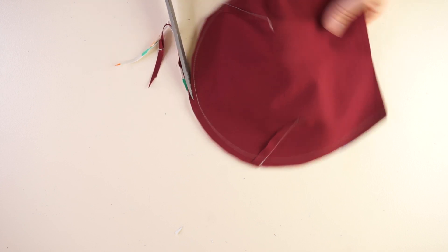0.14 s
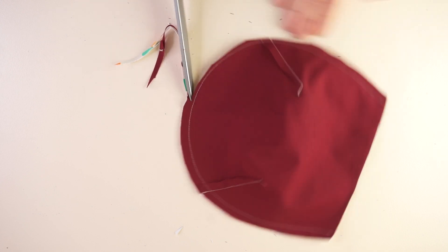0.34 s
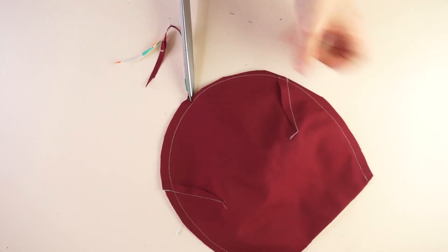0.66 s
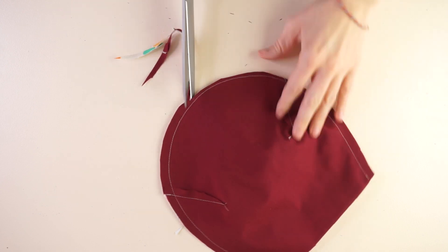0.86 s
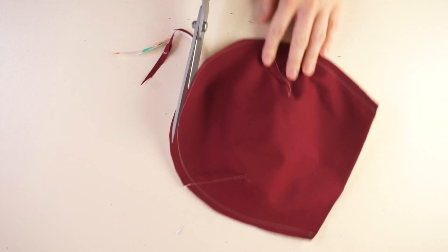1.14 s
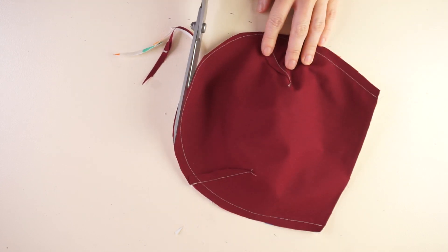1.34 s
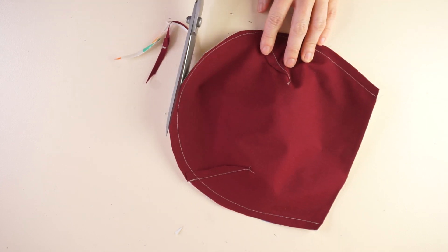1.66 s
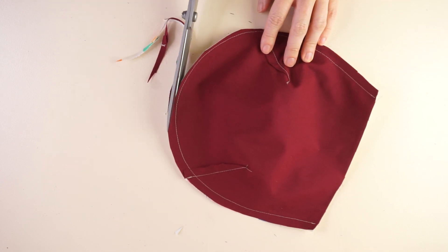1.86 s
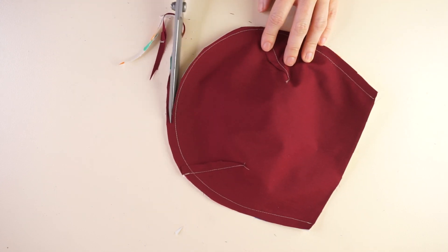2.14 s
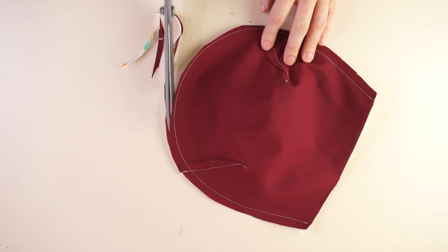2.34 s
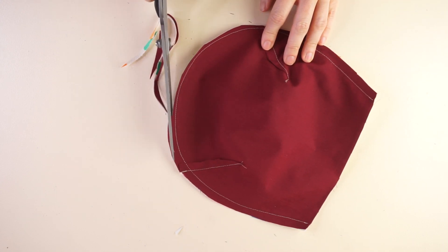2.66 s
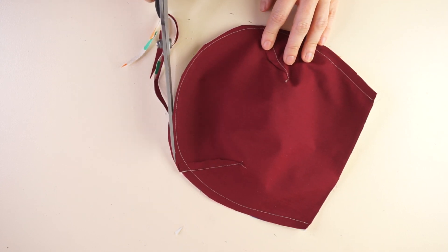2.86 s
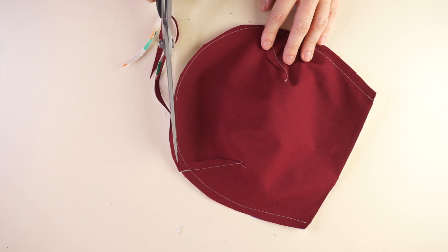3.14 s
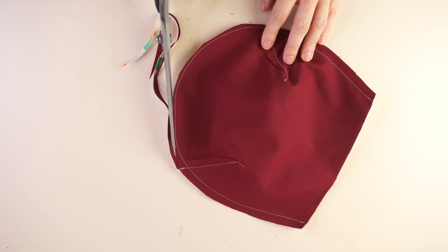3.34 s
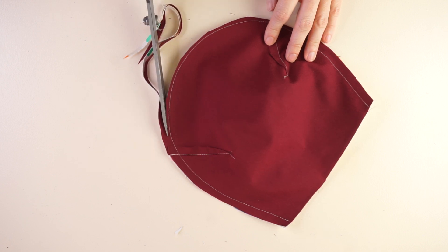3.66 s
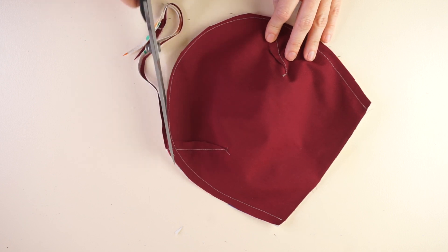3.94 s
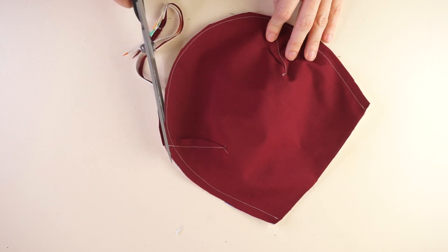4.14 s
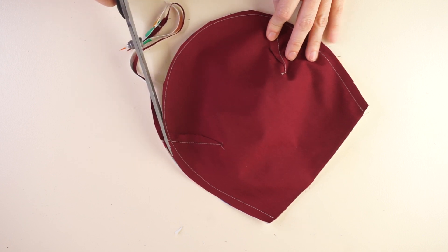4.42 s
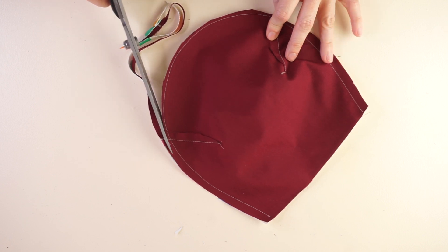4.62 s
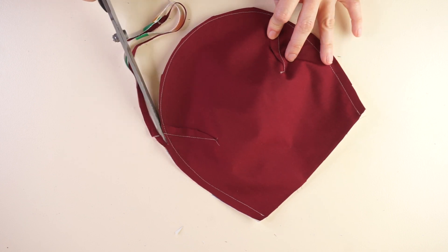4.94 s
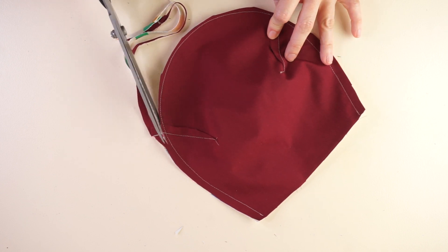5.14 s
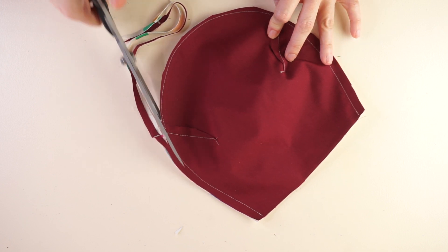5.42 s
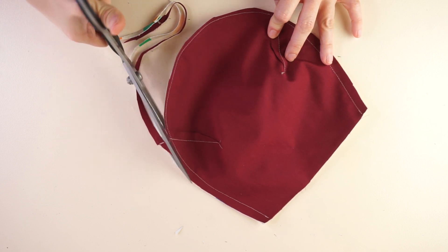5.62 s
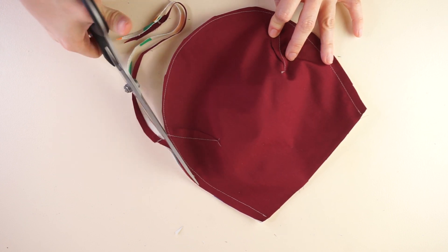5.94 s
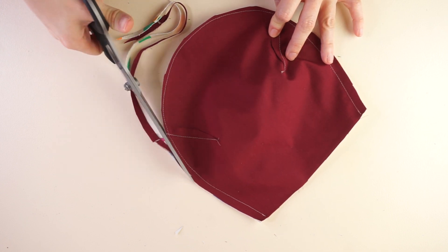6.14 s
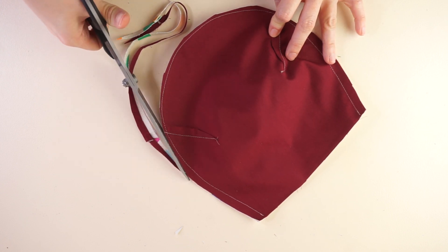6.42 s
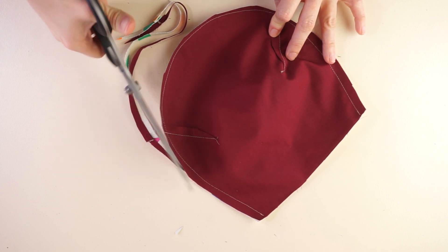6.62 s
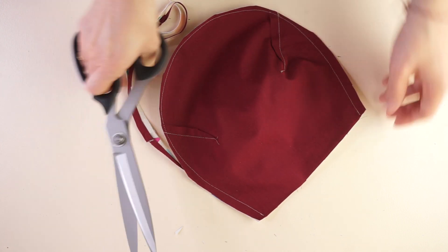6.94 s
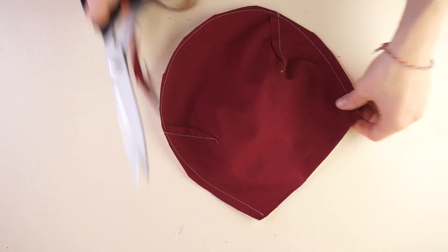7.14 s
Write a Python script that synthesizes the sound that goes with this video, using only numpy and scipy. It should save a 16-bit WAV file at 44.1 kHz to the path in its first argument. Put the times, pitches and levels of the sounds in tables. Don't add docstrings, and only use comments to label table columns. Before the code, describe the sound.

Heavy shears cut stitched cloth in separate scratchy strokes on a hollow tabletop, hands sliding the fabric between, in a quiet small room.

```python
import sys
import numpy as np
from scipy import signal
from scipy.fft import rfft, irfft
from scipy.io import wavfile
from scipy.ndimage import uniform_filter1d

SR = 44100
rng = np.random.default_rng(int(sys.argv[2]) if len(sys.argv) > 2 else 0)


def file_out(sig):
    cols = np.atleast_2d(sig).T
    lim = np.clip(cols, -1, 1)
    pcm = np.round(lim * 32767).astype(np.int16)
    wavfile.write(sys.argv[1], SR, pcm)


def magnitude_from_level(level_db):
    exponent = np.asarray(level_db, float) / 20
    return 10 ** exponent


N = 321048


def evened(x):
    return x / np.sqrt(np.mean(x ** 2) + 1e-20)


def smooth_twice(x, samples):
    return uniform_filter1d(uniform_filter1d(x, samples), samples)


def read(points, hz):
    f, value = np.transpose(points)
    return np.interp(np.log(hz + 1), np.log(f + 1), value)


def add(mix, s, sound):
    part = mix[round(s * SR):][:len(sound)]
    part += sound[:len(part)]


def through(x, taps):
    return signal.oaconvolve(x, taps)[:len(x)]


def colour(points):
    level_db = np.maximum(read(points, np.fft.rfftfreq(4096, 1 / SR)), -100)
    folded = irfft(np.log(magnitude_from_level(level_db)))
    folded[1:2048] *= 2
    folded[2049:] = 0
    taps = irfft(np.exp(rfft(folded)))[:2048]
    return taps / np.linalg.norm(taps)


def body(modes, low_hz=50, high_hz=11500):
    t = np.arange(SR // 8) / SR
    ring = np.zeros(len(t))
    for k, (hz, width_hz, db) in enumerate(modes):
        decay = np.exp(-np.pi * width_hz * t)
        ring += (-1) ** k * magnitude_from_level(db) * width_hz * decay * np.sin(2 * np.pi * hz * t)
    band = signal.butter(3, [low_hz, high_hz], "band", fs=SR, output="sos")
    ring = signal.sosfilt(band, ring)
    return ring / np.linalg.norm(ring)


def grit(per_s, spread_db, lump_s, lump_db):
    size = magnitude_from_level(spread_db * np.minimum(rng.exponential(1, N), 4)) * rng.standard_normal(N)
    breaks = rng.random(N) < per_s / SR
    lumps = evened(smooth_twice(rng.standard_normal(N), int(lump_s * SR)))
    return evened(size * breaks * magnitude_from_level(lump_db * lumps))


def pair(mid, side, width):
    side_gain = magnitude_from_level(read(width, np.fft.rfftfreq(len(side), 1 / SR)))
    side = irfft(rfft(side) * side_gain, len(side))
    return np.array([mid + side, mid - side])


# (frequency [Hz], density [dB/Hz])
HUSH = [(15, -44), (25, -9), (110, 6.5), (166, -2), (256, 0), (564, -9), (710, -10.5), (1100, -12.5),
        (1340, -10.5), (2750, -10.5), (3550, -16), (10400, -21), (11200, -20), (14600, -44), (22000, -120)]
# (frequency [Hz], side re mid [dB])
HUSH_WIDTH = [(60, -24), (220, -1.5), (830, 5.5), (3100, -1.5), (11600, -1)]


def hush():
    mid, side = (through(rng.standard_normal(N), colour(HUSH)) for _ in range(2))
    return magnitude_from_level(-64.5) * pair(mid, side, HUSH_WIDTH)


# (start [s], length [s], rub [dB], airiness re rub [dB], weight re rub [dB])
SLIDES = [(-0.02, 0.097, -45.5, -14, 0), (0.318, 0.11, -44.5, -8.5, -5), (0.374, 0.23, -44.5, -10.5, -12.5),
          (0.5, 0.59, -62, 0, -8), (0.851, 0.13, -54.5, -10, -13), (0.88, 0.85, -53.5, 1.5, -10.5),
          (1.07, 0.31, -59.5, -11, 12), (1.33, 0.58, -60, -46, 9), (2.349, 0.48, -61, 0.5, 1.5),
          (2.93, 0.37, -65.5, -6, 7), (3.7, 0.69, -54.5, -4, -3.5), (4.62, 0.52, -53, -7, 3),
          (5.16, 0.11, -55.5, -3, 3.5), (5.22, 0.32, -62, -7, 7), (5.68, 0.1, -59.5, -12, -16),
          (6.54, 0.83, -58, -8, 1.5), (6.993, 0.033, -46.5, -12, 6), (7.0, 0.25, -52, -13, -2.5),
          (7.123, 0.18, -48, -14, -17), (7.19, 0.16, -48, -12, -13)]


def drags():
    rise, fade_db = 0.19, -19.5
    out = np.zeros((3, N))
    for s, length, db, air_db, weight_db in SLIDES:
        u = np.arange(0, 1, 1 / (length * SR))
        slowing_db = fade_db * np.maximum(u - rise, 0) ** 0.73
        speed = np.minimum(u / rise, 1) ** .5 * magnitude_from_level(db + slowing_db)
        for layer, layer_db in zip(out, (0, air_db, weight_db)):
            add(layer, max(s, 0), magnitude_from_level(layer_db) * speed[round(max(-s, 0) * SR):])
    return uniform_filter1d(out, int(0.003 * SR), axis=-1)


# (frequency [Hz], density [dB/Hz])
RUB = [(290, -13), (500, -4), (1090, -1.5), (1340, -1.5), (1450, -2), (2900, -7.5), (4500, -14),
       (7000, -29), (9900, -120)]
# (frequency [Hz], density [dB/Hz])
SWISH = [(1800, -23), (3500, 7), (4780, 1.5), (7090, -0.5), (10500, 4.5), (11200, 1), (14600, -85),
         (22000, -120)]
# (frequency [Hz], width [Hz], level [dB])
HOLLOW = [(188, 230, -3), (240, 150, 2), (295, 33, 8), (405, 97, 1)]


def sliding():
    rub, swish, rumble = magnitude_from_level(-6) * drags()
    lumps = grit(3000, 2.5, 0.05, 2.5)
    weave = grit(7000, 1.2, 0.012, 2.2)
    return (through(rub * weave, colour(RUB)) + through(swish * weave, colour(SWISH))
            + through(rumble * lumps, body(HOLLOW, 120)))


# (time [s], hand effort [dB])
STROKES = [
    [(0.045, -55.5), (0.08, -45), (0.14, -47.5), (0.185, -49.5), (0.2, -60)],
    [(1.435, -51.5), (1.527, -64.5), (1.679, -57.5), (1.785, -51.5), (1.923, -55.5), (2.017, -45.5),
     (2.089, -47), (2.195, -41.5)],
    [(2.29, -57), (2.37, -64)],
    [(3.2, -69), (3.24, -52.5), (3.286, -50), (3.406, -44), (3.462, -43.5), (3.502, -41), (3.542, -42.5),
     (3.61, -42)],
    [(4.1, -61.5), (4.156, -57.5), (4.276, -41.5), (4.33, -109)],
    [(4.34, -57), (4.43, -60), (4.586, -50.5), (4.714, -110), (4.8, -79)],
    [(4.885, -67), (4.947, -58), (4.969, -38.5), (4.977, -39.5), (5.04, -45)],
    [(5.12, -50.5), (5.216, -84), (5.28, -89)],
    [(6.065, -77), (6.115, -67.5), (6.186, -55.5), (6.256, -54.5), (6.306, -49), (6.36, -52), (6.41, -45)],
]
# (blade ring [dB], overtone [dB], edge hiss [dB], table [dB], all re effort,
# end tip nearness [0-1])
GRIPS = [(2, 2.5, -9.5, -2.5, 0.88), (1, -1.5, -12, -4, 0.84), (3, -2.5, -6, -4, 0.78),
         (0.5, -1.5, -12, -5.5, 0.78), (2, -2.5, -11.5, -3.5, 0.83), (-2, -0.5, -12, -9, 0.93),
         (-3.5, 3.5, -9.5, -4.5, 0.6), (-4, 6, -2.5, -4.5, 0.72), (5.5, 2, -8, 5, 0.67)]


def strokes():
    tip_start, tip_curve = 0.2, 0.58
    levels_db, tip = np.full((4, N), -120.), np.full(N, tip_start)
    for rows, (ring_db, upper_db, hiss_db, table_db, tip_end) in zip(STROKES, GRIPS):
        s, effort_db = np.transpose(rows)
        t = np.arange(s[0], s[-1], 1 / SR)
        travel = ((t - s[0]) / (s[-1] - s[0])) ** tip_curve
        near = tip_start + (tip_end - tip_start) * travel
        at = slice(round(s[0] * SR), round(s[0] * SR) + len(t))
        tip[at] = near
        layers_db = [ring_db + 0 * t, 1.5 + upper_db - 2.5 * near, hiss_db + 6.5 * near, table_db + 6.5 * near]
        levels_db[:, at] = np.interp(t, s, effort_db) + np.array(layers_db)
    return levels_db, tip


def bell(s, length):
    swell_db, release_db = -16.5, -9.5
    length = max(length, .002)
    u = np.arange(-1.5, 4, 1 / (length * SR))
    level_db = np.where(u < 0, swell_db * u ** 2, release_db * abs(u) ** 0.88)
    return s + u[0] * length, magnitude_from_level(level_db), u * length


# (time [s], blade ring [dB], overtone re ring [dB], length
# [s])
BUNCHES = [(0.1123, -28, -21, 0.0096), (0.1468, -22.5, -28, 0.0054), (0.182, -26, -9, 0.0074),
           (1.6641, -25.5, -17.5, 0.01), (1.6871, -34, -6, 0.003), (1.722, -18.5, -14.5, 0.0038),
           (1.7507, -45, -18, 0.0028), (1.7906, -24.5, -11, 0.01), (1.8187, -25.5, -1, 0.0022),
           (1.8312, -20, -12, 0.0025), (1.8601, -30, -5, 0.0052), (1.8744, -31.5, -13, 0.015),
           (1.9176, -18.5, -12, 0.0063), (1.9673, -27, -18, 0.01), (1.994, -25, -7, 0.0038),
           (2.0371, -26.5, -9, 0.013), (2.1058, -25.5, -6, 0.0072), (2.1334, -25.5, -15, 0.0093),
           (2.1493, -18.5, -11, 0.0023), (2.1773, -22.5, -17, 0.0043), (2.2045, -29, -23, 0.0032),
           (3.314, -28.5, -4, 0.0084), (3.3481, -28.5, -9, 0.0035), (3.376, -28.5, -4.5, 0.0045),
           (3.4158, -29, -9, 0.0027), (3.459, -22.5, -7, 0.0045), (3.4717, -24, -6, 0.005),
           (3.4873, -47, -8, 0.0026), (3.5072, -22.5, -11, 0.0084), (3.5385, -28, -10, 0.01),
           (3.5652, -23, -11, 0.0077), (3.611, -18, -18, 0.0017), (3.6272, -38, -22, 0.0024),
           (4.2045, -31, 1, 0.0092), (4.231, -18, -11.5, 0.011), (4.2485, -28, -8, 0.0018),
           (4.2795, -24.5, -11, 0.0025), (4.3213, -38, -24, 0.0035), (4.5732, -25.5, -23, 0.0027),
           (4.9582, -30.5, -1, 0.0078), (5.0104, -37, -19, 0.0022), (6.1801, -26.5, -13, 0.0024),
           (6.1972, -27, -11, 0.0071), (6.2185, -28, -6, 0.0045), (6.2621, -26.5, -10, 0.011),
           (6.2802, -25, -15, 0.0039), (6.3109, -20.5, -10, 0.004), (6.3444, -25.5, -7.5, 0.0099),
           (6.3706, -22, -17, 0.0068), (6.4445, -24.5, -20, 0.0094),
           (0.118, -30, -10, 0.011), (0.168, -36, -15, 0.0034), (0.854, -54, -15, 0.014),
           (0.89, -53, -12, 0.005), (0.908, -57, -12, 0.011), (0.936, -55, -10, 0.014),
           (1.036, -51, 3, 0.005), (1.356, -59.5, -13, 0.03), (2.058, -31, -9, 0.0051),
           (2.086, -28, -6.5, 0.007), (2.189, -43, 1, 0.0057), (3.339, -31.5, 2, 0.006),
           (3.363, -23.5, -6, 0.0062), (3.395, -39, 0, 0.0042), (3.429, -34, 2, 0.008),
           (7.086, -49, -21, 0.01), (7.14, -46, -18, 0.008), (1.444, -48.5, -6, 0.029),
           (1.559, -33, -6, 0.008), (1.589, -32, -10, 0.005), (1.606, -36, -10, 0.005),
           (2.026, -25, -10.5, 0.0062), (2.299, -32, -13, 0.0046), (3.228, -43, 0, 0.012),
           (3.263, -35, -1, 0.0091), (4.11, -39, -3, 0.012), (4.144, -43.5, 3, 0.0046),
           (4.182, -40.5, 6, 0.0083), (4.255, -31.5, 7.5, 0.0071), (4.482, -53, 15.5, 0.0025),
           (4.52, -57, -5, 0.0045), (4.532, -37, -4, 0.006), (4.54, -40, 2, 0.015), (4.562, -47, 3, 0.0076),
           (4.69, -52, 5, 0.0045), (4.739, -46, -1, 0.0069), (4.896, -45, -7, 0.0081),
           (4.944, -38, -7.5, 0.016), (4.963, -36.5, 12, 0.002), (4.982, -37, -21, 0.0048),
           (4.985, -22, -12, 0.0057), (5, -20, -17, 0.0036), (5.139, -31.5, -22, 0.0062),
           (5.244, -41, -19, 0.0084), (6.081, -49.5, -9, 0.0071), (6.115, -47.5, 3.5, 0.0043),
           (6.132, -36, -14, 0.0095), (6.145, -36.5, -6, 0.0047), (6.169, -36.5, -2, 0.0051),
           (6.408, -22, -5, 0.013)]
# (time [s], hiss [dB], edge pitch [Hz], length [s])
SCRAPES = [(0.11, -41, 9300, 0.0073), (0.128, -41, 10100, 0.0092), (0.143, -36.5, 9870, 0.006),
           (0.155, -33, 10200, 0.0049), (0.181, -30.5, 9600, 0.0048), (1.1788, -53, 8600, 0.0022),
           (1.66, -41, 10130, 0.005), (1.686, -46, 10080, 0.004), (1.7206, -37, 9870, 0.005),
           (1.725, -41.5, 9900, 0.0066), (1.7845, -36, 10000, 0.0051), (1.827, -39, 10260, 0.0095),
           (1.859, -37.5, 10160, 0.0067), (1.915, -36, 10340, 0.0057), (1.965, -45.5, 10600, 0.0041),
           (2.065, -33, 9700, 0.0058), (2.089, -29, 10050, 0.0038), (2.104, -31, 9900, 0.0034),
           (2.113, -34, 9800, 0.004), (2.132, -25.5, 9830, 0.0034), (2.147, -28.5, 10000, 0.004),
           (2.167, -29, 9200, 0.0036), (2.174, -30, 9170, 0.0033), (2.192, -33, 8800, 0.0031),
           (3.38, -42, 10100, 0.0034), (3.416, -43, 10700, 0.0066), (3.5067, -31.5, 9600, 0.0034),
           (3.536, -29.5, 9840, 0.0068), (3.553, -36, 9700, 0.0057), (3.565, -31, 9500, 0.0081),
           (3.615, -37, 9400, 0.002), (3.63, -39, 8900, 0.0032), (4.114, -47, 10200, 0.0029),
           (4.143, -51, 10140, 0.0046), (4.182, -42.5, 10570, 0.0045), (4.206, -45, 10550, 0.013),
           (4.573, -41, 9700, 0.004), (4.687, -48, 9500, 0.0048), (4.737, -48, 9560, 0.0043),
           (4.894, -49, 9850, 0.017), (4.991, -45, 10800, 0.003), (5.006, -45, 10500, 0.0056),
           (5.135, -41, 9700, 0.0018), (6.14, -45, 10560, 0.0041), (6.195, -38, 10200, 0.0039),
           (6.216, -47, 10300, 0.0055), (6.369, -36, 10650, 0.0074), (6.432, -33.5, 10300, 0.003),
           (6.515, -46, 10360, 0.0086),
           (0.109, -40.5, 10200, 0.033), (1.557, -46, 9500, 0.0089), (3.34, -46, 10200, 0.038),
          (4.235, -43.5, 10300, 0.027), (4.538, -50.5, 9900, 0.021), (4.712, -56, 9500, 0.0092),
          (4.932, -45.5, 9900, 0.013), (4.951, -35, 9900, 0.0058), (4.956, -30.5, 9800, 0.0054),
          (4.963, -29, 9500, 0.0038), (6.132, -52, 10400, 0.0072), (6.181, -46, 10250, 0.015),
          (6.26, -46, 10200, 0.0083), (6.347, -39.5, 10100, 0.025)]
UPPER_HZ = [2400, 2700, 2700, 2514, 2520, 2750, 2630, 2560, 2510]


def slips(tip):
    blade_hz, blade_rise_hz, blade_spread_hz = 1309, 40, 39
    upper_wander_hz, upper_rough = 75, 0.5
    bunch, upper, scrape, flex, squeak = np.zeros((5, N))
    for s, db, upper_db, length in BUNCHES:
        start, swell, t = bell(s, length)
        hz = blade_hz + blade_rise_hz * tip[round(s * SR)] + blade_spread_hz * rng.standard_normal()
        add(bunch, start, magnitude_from_level(db) * swell)
        add(upper, start, magnitude_from_level(db + upper_db) * swell)
        add(flex, start, swell * magnitude_from_level(db - 6.5) * np.sin(2 * np.pi * hz * t))
    stroke_starts = [rows[0][0] for rows in STROKES]
    stroke = np.maximum(np.searchsorted(stroke_starts, np.arange(N) / SR) - 1, 0)
    wander, rough = (evened(smooth_twice(z, 90)) for z in rng.standard_normal((2, N)))
    upper_hz = np.array(UPPER_HZ)[stroke] + upper_wander_hz * wander
    overtone = np.sin(2 * np.pi * np.cumsum(upper_hz) / SR)
    flex += magnitude_from_level(-7.0) * upper * (1 + upper_rough * rough) * overtone
    for s, db, hz, length in SCRAPES:
        start, swell, t = bell(s, length)
        add(scrape, start, magnitude_from_level(db) * swell)
        add(squeak, start, magnitude_from_level(db) * swell * np.sin(2 * np.pi * hz * t))
    return bunch, upper, scrape, flex, squeak


def gains(levels_db):
    return uniform_filter1d(magnitude_from_level(levels_db), int(0.0086 * SR), axis=-1)


# (frequency [Hz], width [Hz], level [dB])
BOOM = [(76.6, 4.2, -24), (85.9, 7.4, 22)]


def boom_push(drive):
    drum = through(rng.standard_normal(N), body(BOOM))
    drum /= np.sqrt(uniform_filter1d(drum ** 2, 1500) + 0.017)
    lag = np.exp(-np.arange(6000) / SR / 0.015) / (0.023 * SR)
    return through(drive, lag) * drum


# (frequency [Hz], width [Hz], level [dB])
RING = [(972, 196, -9), (1150, 197, -5), (1307, 80, 1), (1471, 72, 0), (1504, 88, -1.5), (1683, 105, -7.5)]
# (frequency [Hz], width [Hz], level [dB])
OVERTONES = [(2260, 710, 1), (2380, 190, 5), (2484, 88, -3.5), (2700, 120, 3), (2764, 260, -0.5),
             (3560, 740, -9.5)]
# (frequency [Hz], width [Hz], level [dB])
TIPS = [(3700, 380, 2), (4300, 360, 6), (4500, 134, 9), (4890, 140, 4), (5240, 300, 1.5), (5840, 420, -1.5),
        (7150, 600, -15)]
# (frequency [Hz], width [Hz], level [dB])
EDGE = [(7600, 18000, -8.5), (8280, 42, 3.5), (9500, 490, -4), (9900, 100, 5.5), (11300, 2800, -2.5)]
# (frequency [Hz], width [Hz], level [dB])
TABLE = [(149, 49, -6), (242.6, 36, 0), (300, 40, 0), (419, 78, -0.5), (520, 61, -2), (598, 60.4, 2),
         (648.2, 28.5, 6.5), (733, 68, 0)]


def cutting():
    levels_db, tip = strokes()
    ring, overtone, hiss, table = gains(levels_db)
    bunch, upper, scrape, flex, squeak = slips(tip)
    threads = grit(7000, 2.2, 0.0065, 3.2)
    fuzz = grit(14000, 1.5, 0.008, 3.5)
    burst = grit(18000, 0.9, 0.006, 1.5)
    wobble = 0.77 + 0.77 * evened(smooth_twice(rng.standard_normal(N), 40))
    follow = np.minimum(np.hypot(1, magnitude_from_level(-10.5) * bunch / (ring + 1e-5)), 4)
    short_db = -24 + 25 * np.clip(tip, 0, 1)
    ring_drive = magnitude_from_level(-0.5) * ring * threads + magnitude_from_level(-12.5) * bunch * burst
    overtone_drive = magnitude_from_level(-4.0) * overtone * fuzz + magnitude_from_level(-14.5) * upper * burst
    tips_drive = overtone * follow ** .25 * gains(short_db) * burst
    edge_drive = magnitude_from_level(-1.0) * hiss * fuzz + magnitude_from_level(-7) * scrape * burst
    blades = through(ring_drive, body(RING, 900, 1730)) + flex
    blades += through(overtone_drive, body(OVERTONES, 990, 3290))
    blades += through(tips_drive, body(TIPS, 3640, 6900))
    edges = through(edge_drive, body(EDGE, 5240)) + magnitude_from_level(-5.5) * squeak * wobble
    edges += magnitude_from_level(-15) * through(scrape * burst, colour(SWISH))
    top = through(table * follow ** .5 * burst, body(TABLE, 141, 760))
    top += magnitude_from_level(-9.5) * boom_push(np.hypot(table * follow, magnitude_from_level(-7.5) * bunch))
    return blades + edges + top


# (frequency [Hz], density [dB/Hz])
CLINK = [(500, -35), (1400, 6), (2000, 1), (2600, -1.5), (3600, -27), (4000, -35), (9900, -94)]


def clinking(blow):
    return magnitude_from_level(15.5) * through(blow, body(OVERTONES, 1600)) + magnitude_from_level(18.0) * through(blow, colour(CLINK))


# (time [s], peak [dB])
TICKS = [
    (0.1846, -31),
    (0.6097, -58),
    (1.178, -39),
    (4.14, -43),
    (4.481, -42),
    (5.767, -57),
]


def ticks():
    out, clink = np.zeros((2, N))
    t = np.arange(300) / SR
    for s, db in TICKS:
        noise = rng.standard_normal(300)
        add(out, s, magnitude_from_level(db - 60 * t / 0.011) * noise)
        add(clink, s, magnitude_from_level(db - 17 - 60 * t / 0.0027) * noise)
    return out + clinking(clink)


# (time [s], peak [dB], pitch [Hz], hardness [dB])
KNOCKS = [(0.321, -44.5, 520, -8), (0.333, -44, 610, -34), (0.347, -57, 610, -26), (1.199, -54, 333, -27),
          (1.302, -25, 426, -25), (1.3073, -31, 430, -33.5), (1.345, -51.5, 460, -44),
          (1.36, -43, 400, -33), (6.998, -68, 370, -12), (7.023, -46, 300, -29), (7.044, -46, 300, -27),
          (7.146, -44.5, 404, -14), (7.174, -39.5, 480, -23), (1.5374, -41, 388, -5),
          (2.81, -31.5, 506, -11), (3.009, -49.5, 394, -33), (3.237, -37.5, 313, -46),
          (3.247, -34, 405, -23), (5.537, -58.5, 1820, -7), (5.815, -51, 240, -38), (6.9922, -55, 350, -5),
          (7.008, -42, 356, -31), (7.135, -52, 382, -12), (7.199, -45.5, 433, -24), (7.212, -57, 1310, -7)]


def knocks():
    t60_s, upper_hz, upper_db = 0.03, 770, -12
    out, push, clink = np.zeros((3, N))
    t = np.arange(SR // 6) / SR
    for s, db, hz, hard_db in KNOCKS:
        note = np.sin(2 * np.pi * hz * t) + magnitude_from_level(upper_db) * np.sin(2 * np.pi * upper_hz * t)
        attack = 1 - np.exp(-t / 0.00085)
        add(out, s, -magnitude_from_level(db + 3 - 60 * t / t60_s) * note * attack)
        add(push, s, magnitude_from_level(db - 4.5 + 0.66 * hard_db) * np.hanning(24))
        noise = rng.standard_normal(1200)
        add(clink, s, magnitude_from_level(db + hard_db - 15.0) * noise * np.exp(-t[:1200] / 0.0056))
    rap = magnitude_from_level(9.5) * through(push, body(TABLE, 103)) + magnitude_from_level(2.0) * through(push, body(BOOM))
    return out + clinking(clink) + rap


# (time [s], peak [dB])
THUDS = [(0.898, -49), (1.108, -54), (2.997, -50.5), (3.238, -38.5), (3.598, -40), (4.102, -48.5),
         (4.973, -39), (5.65, -59), (6.117, -47), (6.416, -34), (6.998, -45.5)]


def thuds():
    thud = np.zeros(N)
    for s, db in THUDS:
        add(thud, s, magnitude_from_level(db - 15.0) * np.hanning(200))
    return through(thud, body(BOOM))


# (time [s], peak [dB], edge [dB], table [dB], blade ring [dB], all re peak)
SNAPS = [
    (3.5943, -37, 20, 5, 19.5),
    (4.9649, -20.5, 9, -24, -10),
    (4.9734, -29, -13, -8, 13),
    (6.4077, -15.5, 2, -10.5, -1),
]
# (frequency [Hz], density [dB/Hz])
CRACK = [(470, -21), (800, -19), (1810, -23), (2550, -3), (4100, -12.5), (5770, -20), (6670, -15.5),
         (10400, -14.5), (11200, 4), (14600, -53), (22000, -120)]
# (frequency [Hz], width [Hz], level [dB])
CLAP = [(2600, 760, 0)]


def snaps():
    contact_s = 0.00069
    crack, edge, thump, blow = np.zeros((4, N))
    t = np.arange(900) / SR
    for s, db, edge_db, table_db, ring_db in SNAPS:
        noise = rng.standard_normal(900)
        click = (t / contact_s) * np.exp(-t / contact_s) * np.sign(noise)
        splinter = noise * np.exp(-t / 0.013)
        add(crack, s, magnitude_from_level(db) * (magnitude_from_level(-8.5) * click + magnitude_from_level(-19) * splinter))
        add(edge, s, magnitude_from_level(db + edge_db) * noise * (t / 0.0021) * np.exp(-t / 0.002))
        add(blow, s, magnitude_from_level(db + ring_db) * np.hanning(11))
        add(thump, s, magnitude_from_level(db + table_db) * np.hanning(20))
    return (magnitude_from_level(5.0) * through(crack, colour(CRACK)) + magnitude_from_level(6.0) * through(crack, body(CLAP, 1900))
            + magnitude_from_level(1.0) * through(blow, body(RING, 1170)) + magnitude_from_level(-7) * through(edge, body(EDGE, 2730))
            + magnitude_from_level(7.5) * through(thump, body(TABLE)))


# (frequency [Hz], t60 [s])
ROOM = [(80, 0.46), (250, 0.43), (700, 0.4), (2000, 0.35), (5000, 0.43), (10000, 0.31)]
# (frequency [Hz], level [dB])
TAIL = [(100, 0), (400, 0), (1300, -1.5), (3000, 0), (6000, -1.5), (10000, -4)]
# (frequency [Hz], side re mid [dB])
WIDTH = [(60, -28), (140, -19), (350, -16), (830, -5), (2000, -8), (4810, 2.5), (11600, -3.5)]


def echoes():
    t = np.arange(SR // 2) / SR
    hz, frame_s, z = signal.stft(rng.standard_normal((2, len(t))), SR, nperseg=512)
    decay = magnitude_from_level(-60 * frame_s / read(ROOM, hz)[:, None])
    tail = signal.istft(z * decay, SR, nperseg=512)[1][:, :len(t)]
    tail *= np.clip(t / 0.014, 0, 1)
    tail *= magnitude_from_level(-0.5) / np.linalg.norm(tail[0])
    tail = irfft(rfft(tail) * magnitude_from_level(read(TAIL, np.fft.rfftfreq(len(t), 1 / SR))), len(t))
    near = rng.standard_normal(len(t)) * np.exp(-t / 0.013)
    return pair(tail[0] + (t == 0), tail[1] + magnitude_from_level(3.0) * near / np.linalg.norm(near), WIDTH)


def room(x):
    turn = np.pi * np.arange(N) / SR / 1.3
    shares = [np.sqrt(2 / 3) * abs(np.cos(turn + k * np.pi / 3)) for k in range(3)]
    direct = sum(shares)
    out = np.zeros((2, N))
    for share in shares:
        placed = x * share / direct ** .5
        out += signal.fftconvolve(placed[None], echoes(), axes=1)[:, :N]
    return out


def scene():
    table_top = sliding() + cutting() + ticks() + knocks() + thuds() + snaps()
    rumble_cut = signal.butter(3, 64, "high", fs=SR, output="sos")
    return room(signal.sosfilt(rumble_cut, table_top)) + hush()


def top_cut(x):
    return signal.sosfilt(signal.butter(12, 12170, fs=SR, output="sos"), x)


def record(dry):
    low_pass = signal.firwin(301, 11015, window=("kaiser", 6.0), fs=SR)
    mix = signal.oaconvolve(dry, low_pass[None], "same")
    return top_cut(mix)


dry = scene()
out = record(dry)
file_out(out)
```